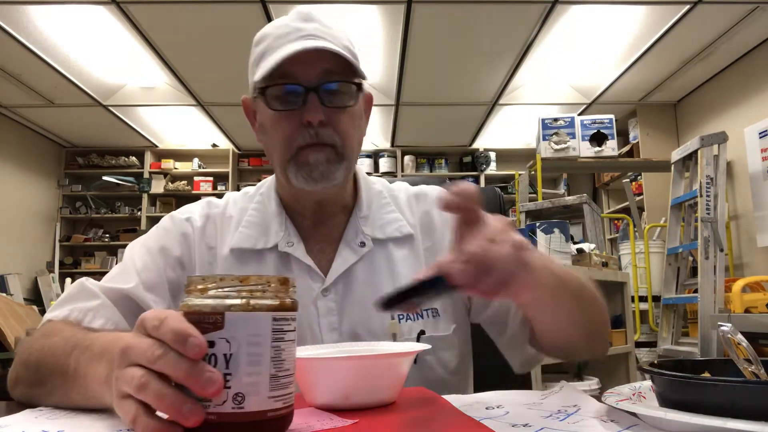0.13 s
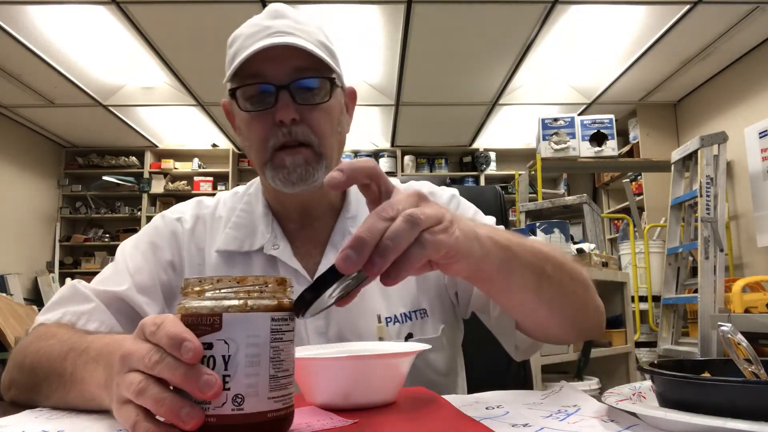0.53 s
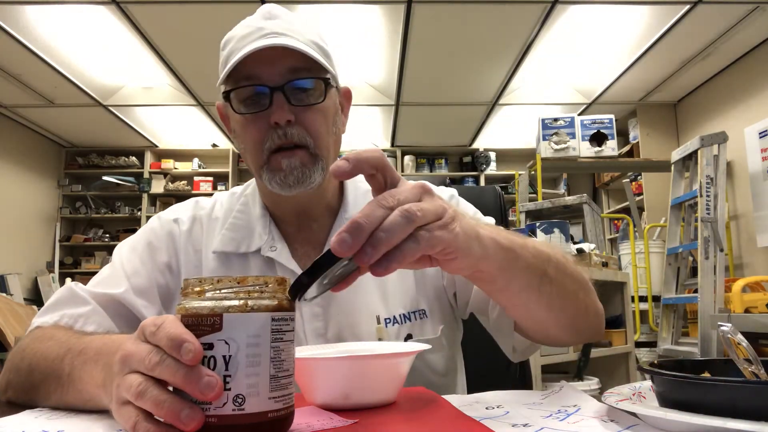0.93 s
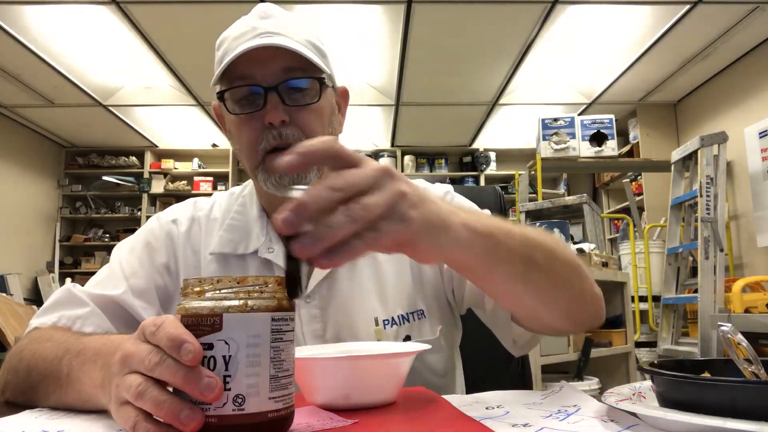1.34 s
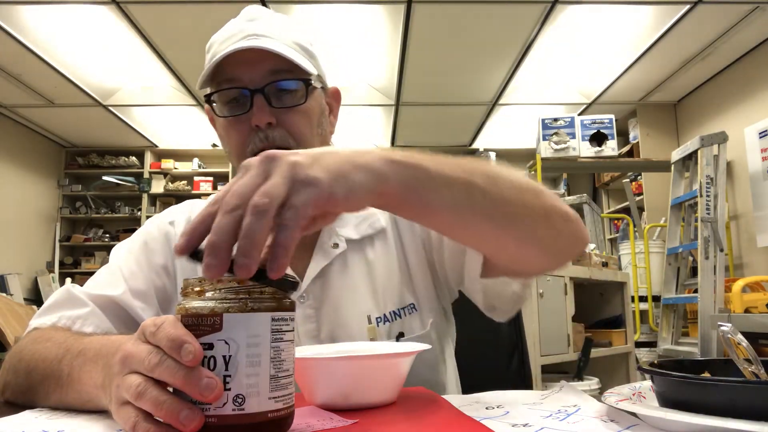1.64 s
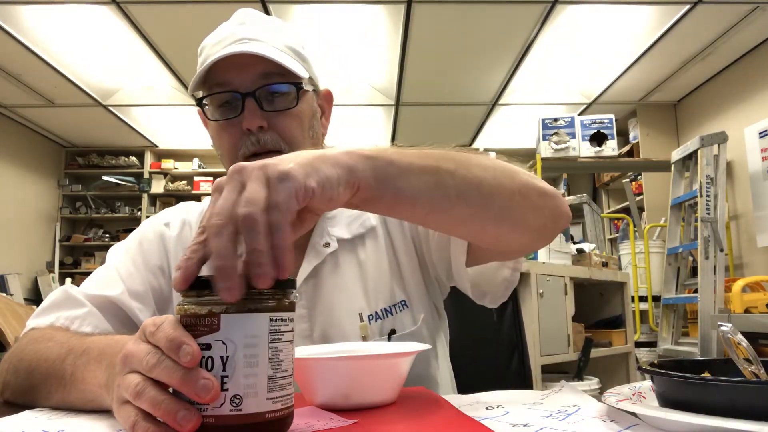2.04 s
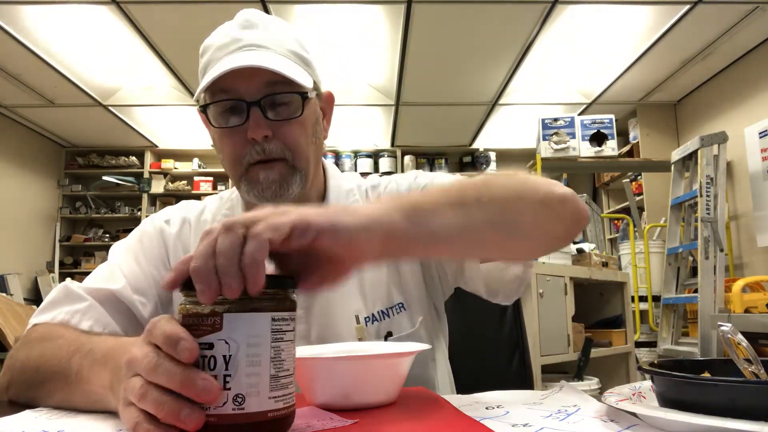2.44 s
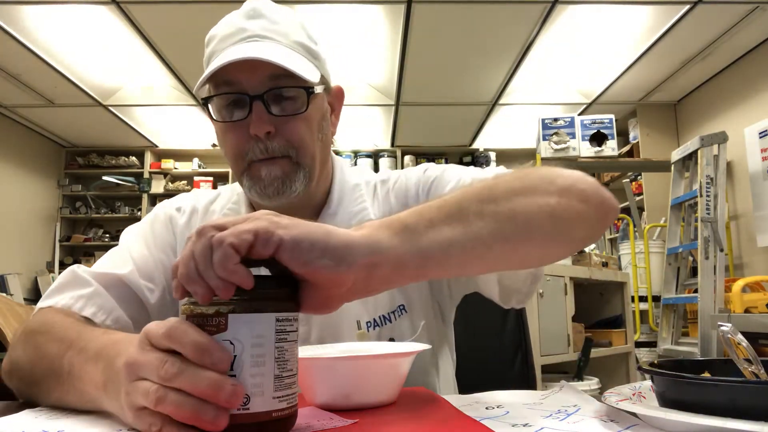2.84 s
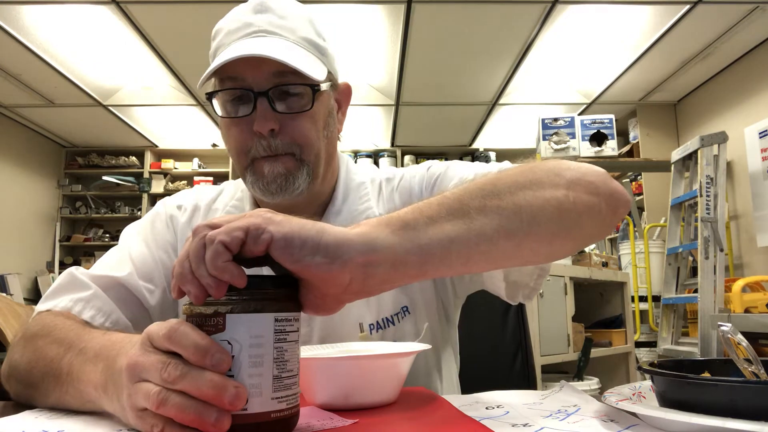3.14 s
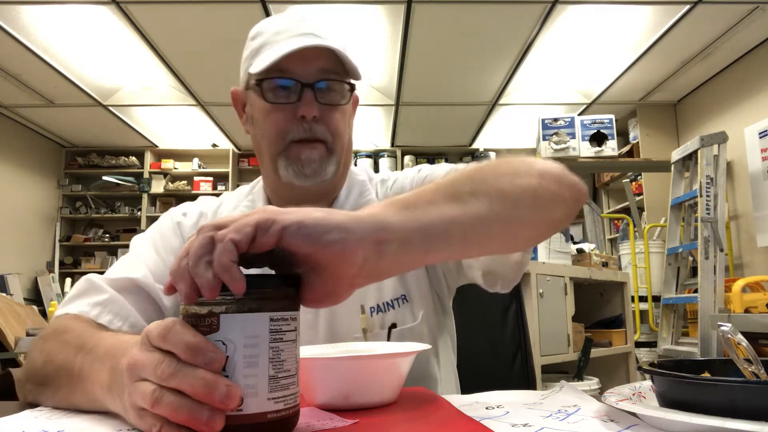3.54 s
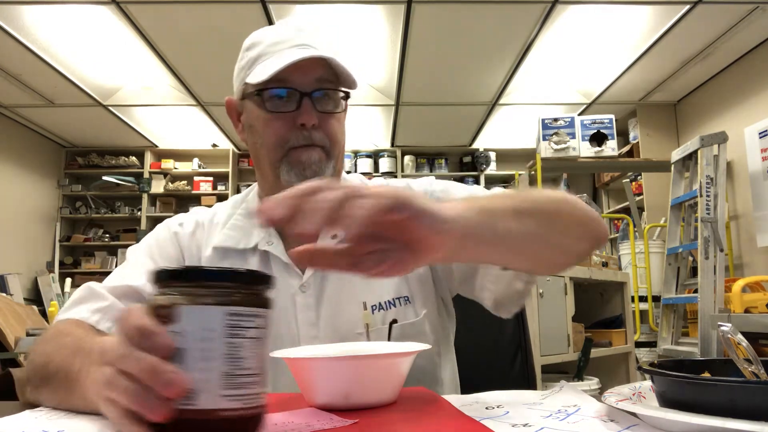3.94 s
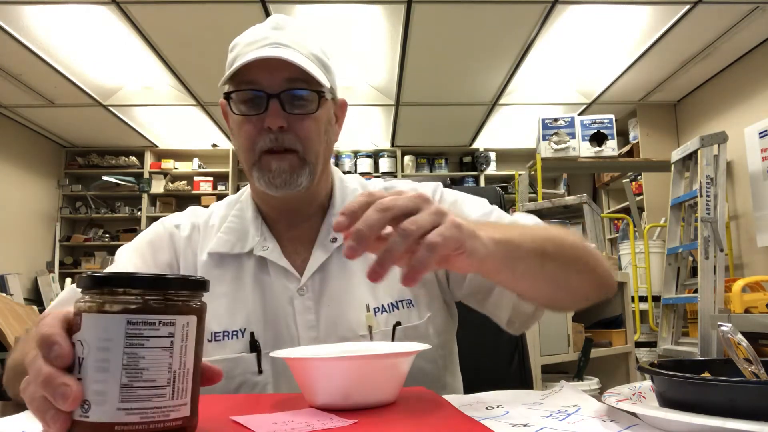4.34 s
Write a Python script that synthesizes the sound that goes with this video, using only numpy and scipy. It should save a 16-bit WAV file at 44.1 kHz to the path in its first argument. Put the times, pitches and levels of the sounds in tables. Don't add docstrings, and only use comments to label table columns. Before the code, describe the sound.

In a humming storeroom, a steel lid clinks on a glass jar, rattles, clacks into place and is twisted shut; finally plastic snaps sharply.

```python
import sys
import numpy as np
from scipy import signal
from scipy.fft import rfft, irfft, next_fast_len
from scipy.io import wavfile
from scipy.ndimage import uniform_filter1d, map_coordinates

SR = 44100
rng = np.random.default_rng(int(sys.argv[2]) if len(sys.argv) > 2 else 0)


def dump(signal):
    limited = np.clip(np.atleast_2d(signal).T, -1, 1)
    pcm = np.round(limited * 32767).astype(np.int16)
    wavfile.write(sys.argv[1], SR, pcm)


def voltage_ratio(level):
    return 10 ** (np.asarray(level, float) / 20)


N = 198224

# f/Hz, density/dB per Hz
VENT_SPECTRUM = [(15, -74), (25, -72), (48, -10.5), (90, -10.5), (124, -2), (213, -8), (312, -16),
                 (421, -21), (515, -27), (681, -31), (1170, -31.5), (1270, -31.5), (3000, -111),
                 (3900, -93), (6600, -120)]
# t/s, length/s, surge/dB
MOTOR_PAUSES = [
    (1.257, .075, 10),
    (1.415, 0.15, 17),
    (2.395, 0.066, 2),
    (3.406, 0.036, 6),
]
# f/Hz, t60/s
ROOM_T60 = [(300, 0.28), (1500, 0.19), (5000, 0.36), (9000, 0.24), (15000, 0.2)]
# delay/s, level/dB
REFLECTIONS = [
    (.004, -52),
    (0.01, -34),
    (0.02, -77),
]
# f/Hz, level/dB
MIC_RESPONSE = [(20, -12), (40, -1), (12000, 0), (15700, -1.5), (16000, -8), (16600, -33), (16900, -68)]
# f/Hz, density/dB per Hz
PREAMP_SPECTRUM = [(1000, 9), (2000, 6.5), (2900, -7), (3900, 18), (6000, -1), (9000, -5), (16000, -11)]

# f/Hz, density/dB per Hz
DRONE_SPECTRUM = [(250, -35), (420, -3.5), (660, -4.5), (900, -13), (1300, -24)]
SKIN_SPECTRUM = [(500, -24), (1000, -7.5), (1500, -0.5), (2050, -3), (2600, -2), (3200, -4), (4500, -4),
                 (7000, -62)]
HISS_SPECTRUM = [(2500, -33), (4500, 1.5), (7500, 1), (9000, -4.5), (15000, -7), (16500, -31)]
# t/s, length/s, rub/dB, swell
# over stroke/dB, relative hiss/dB
RUB_STROKES = [(-.02, 0.15, -69, -10, -5.5), (0.063, 0.21, -69.5, -18, -6), (0.183, 0.32, -74.5, 12, -13),
               (1.45, 0.14, -69.5, 6, -11), (1.927, 0.21, -64, -29, -6), (2.28, 0.13, -76.5, 6, -4),
               (2.4, 0.32, -70, -3, -4.5), (2.684, 0.2, -68, -4, -0.5), (3, 0.087, -70.5, -5, -7.5),
               (3.451, 0.27, -70, -1, -5.5), (3.743, 0.18, -64.5, 20, -8), (3.937, 0.15, -74.5, 9, -1),
               (4.051, 0.12, -60.5, 12, -3.5), (4.165, 0.34, -67, 0.5, -2.5)]
# t/s, length/s, level/dB, swell/dB
JAR_DRAGS = [
    (1.76, 0.075, -56, -7),
    (2.04, 0.16, -70, -1),
    (2.85, 0.2, -74, 6),
    (3.5, 0.086, -85, 1),
    (3.74, 0.2, -58.5, 0.5),
    (3.94, 0.16, -72, 22),
]
# t/s, level/dB rms, f/Hz, length/s, width/octaves
SQUEAK_EVENTS = [(0.818, -67, 1680, 0.022, 0.095), (1.023, -69, 4440, 0.014, 0.023),
                 (1.283, -70, 4000, 0.033, 0.019), (1.384, -66, 4230, 0.056, 0.02),
                 (1.485, -66, 1580, 0.029, 0.07), (1.504, -62, 1500, 0.014, 0.1),
                 (1.492, -71, 4150, 0.033, 0.043), (1.543, -66, 2600, 0.02, 0.04),
                 (2.345, -67.5, 4340, 0.031, 0.031), (3.022, -72, 1380, 0.11, 0.12),
                 (3.221, -70, 4315, 0.021, 0.015), (3.692, -74, 13100, .03, .1),
                 (3.636, -67, 2380, 0.035, 0.15), (3.7, -72.5, 2640, 0.2, 0.1), (3.73, -69, 1650, 0.1, .17),
                 (3.73, -63, 650, 0.21, 0.18), (3.815, -61, 662, .08, .05), (3.75, -70, 1150, .13, .12),
                 (3.87, -67, 1400, .055, .15), (3.885, -68, 2400, .04, .07), (3.87, -61, 300, .06, .4),
                 (3.865, -63, 3200, 0.075, 0.1)]
# t/s, peak/dB, f/Hz, crack/dB
TICK_EVENTS = [(0.1369, -48, 763, -4), (.231, -60, 2590, 3), (1.494, -55, 1600, -1), (1.507, -56, 1500, 3),
               (1.511, -51, 4100, -3), (1.5414, -41, 2600, -4), (1.5404, -45.5, 4300, -2),
               (1.542, -46, 1480, -2), (.297, -60, 2300, -15), (.335, -40, 6670, -9), (0.781, -54, 1060, 5),
               (2.199, -76, 11000, 3), (2.309, -64, 6000, -8), (2.47, -58, 12500, 11.5),
               (2.779, -60, 11900, 6), (2.914, -57.5, 1560, 12.5), (3.561, -62, 12500, -3),
               (3.654, -57, 4400, 13), (4.079, -59.5, 6400, 14), (4.079, -63, 1500, 14),
               (4.233, -52, 2320, -32), (4.32, -50, 11200, 11.5), (4.339, -56, 7500, 4),
               (4.347, -58, 12000, 3), (4.414, -47, 1430, 3)]
# f/Hz, t60/s
TICK_DECAY = [(700, 0.029), (5000, 0.017), (12000, 0.0072)]
# t/s, peak/dB, f/Hz, t60/s, crack/dB
TABLE_THUDS = [
    (1.736, -47, 148, 0.18, 0.5),
    (1.912, -39, 205, 0.049, -20),
    (1.96, -56.5, 148, 0.19, 13.5),
    (2.21, -79, 200, 0.061, -15),
    (2.917, -49, 278, 0.059, 10),
    (3.668, -49, 482, 0.014, 6.5),
    (1.79, -50, 69, 0.33, -4),
    (1.965, -47.5, 78.7, 0.28, -10),
    (2.06, -54, 70.6, 0.18, -6),
]

# t/s, treble modes/dB, then relative level/dB of low, lower middle, middle mode groups
PICKUP_HITS = [
    (.4303, -28.5, -6, -16, -8),
    (.432, -40.5, 0, 4, 12),
    (1.5398, -52, -1, 10, 2),
    (1.5434, -55.5, -4, 18.5, -13),
]
CLINK_HITS = [
    (.8412, -37, -31, -34, -2.5),
    (.8427, -20.5, -51, -49, -9),
    (.8443, -30.5, -5, -13, 4),
    (.885, -42, -12, -20, -9),
    (.899, -53.5, 6, -24, 4),
]
EDGE_HITS = [
    (1.6598, -36, -30, 3.4, -9),
]
RIM_HITS = [
    (1.509, -58, -26, -23, -8),
    (1.5274, -48.5, 2, -5, -25),
    (1.7342, -26.5, -2, 8, -5.5),
    (1.7373, -37.5, 0, -21, 11),
    (1.7519, -31.5, 3, 10.5, 1.5),
]
RATTLE_HITS = [
    (1.7769, -34.5, -5, 5, -5.5),
    (1.7984, -52, -3, 15, -2),
    (1.812, -55, 15, 8, 5),
    (1.8225, -35, -18, 2.5, -1),
    (1.8254, -46.5, -2, -2, 18.5),
    (1.8482, -55.5, 25, 10, 3),
    (1.8704, -52.5, 26.5, 16, 12.5),
    (1.876, -57, 28, 15, 0),
]
LAND_HITS = [
    (1.9065, -37, 3, -7, 3),
    (1.9097, -23.5, -22, -3.5, -12),
    (1.912, -30.5, 13, 0.5, 8),
    (1.9165, -37, -5, 5, 3),
    (1.926, -48, -7, 19.5, -5),
]
SEAT_HITS = [
    (1.9452, -35, 7, -20, 0),
    (1.949, -40.5, 10.5, -7, 11),
    (1.9515, -24, -24, -23, -7),
    (1.9545, -27, -19, 4, 1.5),
    (1.9578, -25, 13, -12, 3),
    (1.9605, -33.5, -24, -5, 11),
    (1.9628, -20.5, -19, -34, 2),
    (1.9657, -14.5, -0.5, -12, -6),
    (1.9727, -37.5, 18, -28, -11),
]
SETTLE_HITS = [
    (1.988, -54.5, 17.3, 0, -4),
    (2.022, -74, 13, 0, 0),
    (2.072, -60, 13.7, -10, 9),
    (2.0824, -56.5, 18.3, -10, 9.5),
    (2.1344, -65.5, 22, -10, 6),
    (2.166, -65, 14, 0, 9),
]
SNAP_HITS = [
    (.3638, -31.5, -30, -25, -15),
    (.3655, -29.5, -18, -5, -1),
    (.3667, -29.5, -11, -14, 0),
    (.371, -40.5, -3, 2, -8),
]
TRAY_HITS = [
    (4.378, -28, -34, -30, -15),
    (4.3798, -18, -30, -21, -20),
    (4.3813, -17, -25, -23, -18),
    (4.3834, -27.5, -22, -12, -11),
    (4.3857, -17.5, -19, -29, -22),
    (4.3875, -33.5, -8, -13, 2),
    (4.3975, -47, -22, -22, -12),
    (4.408, -49, -20, -20, -15),
]

# f/Hz, level/dB, t60/s
LOOSE_MODES = [(450, 7, 0.028), (591, -3.5, 0.093), (638, 4.5, 0.041), (939, 0.5, 0.07), (1646, 5.5, 0.027),
               (1850, -12, 0.036), (2150, -19.5, 0.2), (2400, -11, 0.13), (3070, -12.5, 0.076),
               (4480, -0.5, 0.056), (5200, -4, 0.035), (6380, 0.5, 0.02), (6750, -2, 0.019),
               (7930, -0.5, 0.04), (10360, -4.5, 0.022), (12260, -10, 0.043)]
FREE_MODES = [(584, 3.5, 0.056), (900, -2.5, 0.077), (1630, 5, 0.047), (1880, -2, 0.018),
              (2147, 9.5, 0.023), (2190, -17, 0.14), (2370, -6.5, 0.054), (3190, -3, 0.065),
              (3460, 1, 0.02), (3780, -10, 0.07), (4630, 5, 0.015), (4693, -1, 0.045), (5130, -6.5, 0.049),
              (5020, -27, 0.063), (5990, -15, 0.066), (6360, -1.5, 0.0185), (7780, 0, 0.011),
              (9970, -19, 0.034)]
EDGE_MODES = [(970, -15, 0.044), (1174, 1.5, 0.026), (1634, 0, 0.07), (2520, -10, 0.042),
              (2790, 1.5, 0.016), (4700, 4, 0.021), (5575, -8, .015), (6770, -2.5, 0.014), (7360, -7, .02)]
RIM_MODES = [(500, 3, 0.03), (640, 3, 0.022), (928, -2.5, 0.095), (1115, -14, 0.02), (1590, -1, 0.016),
             (1890, 6, 0.02), (2200, -2, 0.012), (2440, -8, .015), (3050, -8, 0.015), (3850, -8, 0.02),
             (4600, 1, 0.03), (5260, -6, 0.02), (6000, -7.5, 0.015), (10300, -17, .04), (6950, -10, 0.015),
             (7580, -13, 0.02)]
LOW_MODES = [(480, 1, .032), (580, 1, .03), (700, -4, .015), (898, 0, .045), (1200, -2, .02),
             (1610, 3, .022), (1890, -1, .015), (2510, -7, .022), (3750, -10, .02), (4700, 0, .025),
             (5290, -8, .025), (5980, -11, .015), (7100, -14, .015), (7520, -11, .02)]
LAND_MODES = [(565, 7, .028), (899, 0, .05), (1570, 2, .02), (1680, -6, .06), (1960, -1, .018),
              (2400, -8, .012), (3210, -8, .02), (3900, -2, .025), (4760, 3, .035), (5610, -4, .02),
              (6300, -1, .025), (7910, -9, .025), (10200, -12, .03)]
SEATED_MODES = [(395, -5, 0.05), (522, 3, 0.035), (630, 4, 0.03), (714, -6, 0.02), (915, -0.5, 0.04),
                (1480, -5, 0.018), (1628, 4, 0.022), (1822, -1, 0.018), (2200, -9, 0.012),
                (2470, -6, 0.012), (2950, -8, 0.04), (3980, -6, 0.02), (4545, -5, 0.06), (4810, 4, 0.015),
                (5380, 0, .02), (5840, 5, 0.008), (6900, 2, 0.005), (7850, -12, .02)]
REST_MODES = [(466, 8.5, 0.034), (592, 8.5, 0.038), (895, -5, .03), (1650, -1.5, .025), (2140, -4, .02),
              (2420, -3.5, .03), (4500, -5, .03)]
BENT_MODES = [(486, 6.5, .02), (1160, -0.5, 0.022), (1600, -6.5, 0.011), (2450, 1, 0.01), (3340, 6, .01),
              (3650, 4.5, .015), (4100, 4, 0.023), (4700, 0, .015), (5600, -10, 0.011), (6500, -3, .015),
              (6820, 1.5, 0.015), (7600, -4, .012), (8860, -5, .015), (10100, -2.5, 0.011),
              (10580, -3.5, .015), (11940, -4, .012)]
FLAT_MODES = [(484, 3, .022), (1100, 3, .012), (1450, 1, .01), (1820, 3, .012), (2760, 1, .009),
              (3130, 2, .007), (3750, -12, .04), (4020, 8, .007), (4030, -8, .035), (4470, 4, .006),
              (5020, 1, .006), (6410, -5, .007), (7150, -2, .008), (7450, -3, .008), (7970, -13, .07),
              (8420, -5, .008), (8940, -2, .007)]
MODE_GROUP_EDGES = [770, 1280, 2700]


def unit(x):
    return x / np.sqrt(np.mean(x ** 2) + 1e-20)


def along(points, hz):
    f, v = np.transpose(points)
    return np.interp(np.log(hz + 1), np.log(f + 1), v)


def wobble(rate_hz):
    knots = rng.standard_normal(int(N * rate_hz / SR) + 4)
    return map_coordinates(knots, [np.arange(N) * rate_hz / SR])


def noise(spectrum, grain_db=0):
    m = next_fast_len(N + 8192)
    white = rng.standard_normal(m)
    grain = np.repeat(rng.exponential(size=m // 32 + 1), 32)[:m]
    limits = [(28, -120)] + list(spectrum) + [(22000, -120)]
    gain = voltage_ratio(along(limits, np.fft.rfftfreq(m, 1 / SR)))
    return unit(irfft(rfft(white * voltage_ratio(grain_db * grain)) * gain, m)[:N])


def burst(count, hz, octaves):
    away = np.log2((np.fft.rfftfreq(count, 1 / SR) + 1) / hz) / octaves
    return unit(irfft(rfft(rng.standard_normal(count)) * np.exp(-away ** 2), count))


def add(track, s, sound):
    part = track[round(s * SR):][:len(sound)]
    part += sound[:len(part)]


def echoed(hit, wet_db):
    hz, t, z = signal.stft(rng.standard_normal(SR // 3), SR, nperseg=256)
    decay = voltage_ratio(-60 * t / along(ROOM_T60, hz)[:, None])
    tail = signal.istft(z * decay, SR, nperseg=256)[1]
    answer = np.pad(voltage_ratio(wet_db) * tail / np.linalg.norm(tail), (300, 0))
    answer[0] = 1
    for delay_s, db in REFLECTIONS:
        answer[round(delay_s * SR)] += voltage_ratio(db)
    return signal.fftconvolve(hit, answer)


def motor_levels():
    pause_db, stall_db = -28, -25
    t = np.arange(N) / SR
    whine_db, chatter_db = np.full(N, -79.5), np.full(N, -76.0)
    for s, length_s, surge_db in MOTOR_PAUSES:
        inside = (t > s) & (t < s + length_s)
        whine_db += pause_db * inside
        chatter_db += inside * (stall_db + (surge_db - stall_db) * (t - s) / length_s)
    return uniform_filter1d(whine_db, SR // 50), uniform_filter1d(chatter_db, SR // 50)


def machinery():
    whine_db, chatter_db = motor_levels()
    t = np.arange(N) / SR
    whine_cycles = np.cumsum(3580 + 8 * wobble(40)) / SR
    whine = voltage_ratio(whine_db + 3 + 1.8 * wobble(60)) * np.sin(2 * np.pi * whine_cycles)
    pulses = (1 + 0.7 * np.sin(2 * np.pi * 127 * t)) * voltage_ratio(2.5 * wobble(60))
    chatter_noise = noise([(3700, 16.5), (4000, 5.5), (4220, 29), (4450, 9.0), (4900, -14)])
    chatter = voltage_ratio(chatter_db) * unit(pulses * chatter_noise)
    hum = voltage_ratio(-65.5) * np.sin(2 * np.pi * 120 * t) + voltage_ratio(-68.5) * np.sin(2 * np.pi * 63 * t)
    return voltage_ratio(-57) * noise(VENT_SPECTRUM) + hum + whine + chatter


def strokes(rows, rest_db):
    edge_s, rise_share, release_t60_s = 0.02, 0.095, 0.17
    t, gain = np.arange(N) / SR, voltage_ratio(rest_db)
    for s, length_s, db, swell_db in rows:
        rise = np.clip((t - s) / (edge_s + rise_share * length_s), 0, 1)
        after_db = -60 * np.maximum(t - s - length_s + edge_s, 0) / release_t60_s
        tilt_db = swell_db * np.clip((t - s) / length_s - 0.5, -0.5, 0.5)
        gain = np.hypot(gain, rise * voltage_ratio(db + after_db + tilt_db))
    return gain


def rubbing():
    flutter = wobble(36)
    rub_rows = [row[:-1] for row in RUB_STROKES]
    hiss_rows = [(s, length_s, db + hiss_db, swell_db) for s, length_s, db, swell_db, hiss_db in RUB_STROKES]
    drone = strokes(JAR_DRAGS, rest_db=-73) * voltage_ratio(0.7 * flutter) * noise(DRONE_SPECTRUM, grain_db=0.6)
    rub = strokes(rub_rows, rest_db=-77.5) * voltage_ratio(0.9 * flutter) * noise(SKIN_SPECTRUM, grain_db=1.5)
    hiss = strokes(hiss_rows, rest_db=-78.5) * voltage_ratio(2.0 * flutter) * noise(HISS_SPECTRUM, grain_db=1.0)
    return drone + rub + hiss


def squeaks():
    track = np.zeros(N)
    for s, db, hz, length_s, octaves in SQUEAK_EVENTS:
        count = round(length_s * SR)
        squeak = unit(burst(SR // 4, hz, octaves)[:count])
        add(track, s, voltage_ratio(db + 2.0) * np.hanning(count) ** 0.5 * squeak)
    return track


def knocks(rows, octaves, wet_db):
    track, t = np.zeros(N), np.arange(SR // 10) / SR
    for s, db, hz, t60_s, crack_db in rows:
        shape = voltage_ratio(db - 60 * t / t60_s) * (1 - np.exp(-t / 0.00015))
        sound = np.sin(2 * np.pi * hz * t) + voltage_ratio(crack_db - 6.5) * burst(len(t), hz, octaves)
        add(track, s, echoed(shape * sound, wet_db))
    return track


def small_impacts():
    tick_rows = [(s, db, hz, along(TICK_DECAY, hz), crack_db) for s, db, hz, crack_db in TICK_EVENTS]
    return knocks(tick_rows, octaves=0.86, wet_db=-16) + knocks(TABLE_THUDS, octaves=0.87, wet_db=-3.5)


def sheet(contacts, modes, crunch_db, crack_db, crack_t60, wet_db, crowd_db=-26.5, stretch=0.0006):
    scatter_db, wander_rate = 2, 1.6e-5
    hard_db, crack_growth = -22, 0.27
    crowd_t60_s = 0.059
    track, t = np.zeros(N), np.arange(SR // 6) / SR
    hz, level_db, t60_s = (np.array(c)[:, None] for c in zip(*modes))
    group = np.searchsorted(MODE_GROUP_EDGES, hz)
    chance = rng.standard_normal((len(contacts), len(modes), 1))
    swell = 1 - np.exp(-t * hz / 1.93)
    bent_t = t + (group == 1) * stretch * 0.0086 * (1 - np.exp(-t / 0.0045))
    crack_shape = voltage_ratio(-60 * t / crack_t60) * (1 - np.exp(-t / 0.0014))
    crowd_shape = voltage_ratio(crowd_db - 60 * t / crowd_t60_s) * (1 - np.exp(-t / 0.0039))
    for (s, db, low_db, drum_db, middle_db), luck in zip(contacts, chance):
        group_db = np.array([low_db, drum_db, middle_db, -6])[group]
        strength_db = group_db + level_db + scatter_db * luck
        wander = wander_rate * hz * np.cumsum(rng.standard_normal((len(modes), len(t))), axis=1)
        partials = voltage_ratio(strength_db - 60 * t / t60_s) * swell * np.sin(2 * np.pi * hz * bent_t + wander)
        grit = voltage_ratio(middle_db) * burst(len(t), 1670, 0.99) + burst(len(t), 5000, 0.55)
        bright = voltage_ratio(crack_db + crack_growth * (db - hard_db)) * burst(len(t), 15700, 0.51)
        crack = crack_shape * (voltage_ratio(crunch_db) * grit + bright)
        hit = np.sum(partials, axis=0) + crowd_shape * grit + crack
        add(track, s, echoed(voltage_ratio(db - 2.0) * hit, wet_db))
    return track


def tray():
    track = sheet(SNAP_HITS, BENT_MODES, crunch_db=-5, crack_db=-5, crack_t60=0.0088, wet_db=-15.5, crowd_db=-19)
    track += sheet(TRAY_HITS, FLAT_MODES, crunch_db=-14, crack_db=-4, crack_t60=0.0051, wet_db=-17.5, crowd_db=-25)
    return track


def lid():
    held = sheet(PICKUP_HITS, LOOSE_MODES, crunch_db=-7, crack_db=-1.5, crack_t60=0.031, wet_db=-15, crowd_db=-21)
    held += sheet(CLINK_HITS, FREE_MODES, crunch_db=-21, crack_db=-5.5, crack_t60=0.018, wet_db=-14.5, crowd_db=-20)
    rim = sheet(EDGE_HITS, EDGE_MODES, crunch_db=-11, crack_db=-7, crack_t60=0.019, wet_db=-15)
    rim += sheet(RIM_HITS, RIM_MODES, crunch_db=-4.5, crack_db=-11, crack_t60=0.026, wet_db=-18.5, stretch=0.066)
    rim += sheet(RATTLE_HITS, LOW_MODES, crunch_db=-3, crack_db=-31, crack_t60=0.012, wet_db=-14, stretch=0.025)
    seat = sheet(LAND_HITS, LAND_MODES, crunch_db=1.5, crack_db=-4, crack_t60=0.012, wet_db=-18.5)
    seat += sheet(SEAT_HITS, SEATED_MODES, crunch_db=3, crack_db=-6.5, crack_t60=0.011, wet_db=-17.5)
    seat += sheet(SETTLE_HITS, REST_MODES, crunch_db=-8, crack_db=-9, crack_t60=0.013, wet_db=-23)
    return held + rim + seat


def scene():
    mix = lid() + tray() + small_impacts() + squeaks() + rubbing() + machinery()
    return mix[None]


def band_limit(x):
    return signal.sosfilt(signal.butter(12, 16830, fs=SR, output="sos"), x)


def record(dry):
    hz = np.fft.rfftfreq(N, 1 / SR)
    port_dip_db = -1.5 * np.exp(-((hz - 8730) / 930) ** 2)
    self_noise = voltage_ratio(-75.0) * noise(PREAMP_SPECTRUM)
    heard = rfft(dry) * voltage_ratio(port_dip_db) + rfft(self_noise)
    mix = irfft(heard * voltage_ratio(along(MIC_RESPONSE, hz)), N)
    return band_limit(mix)


dry = scene()
out = record(dry)
dump(out)
```